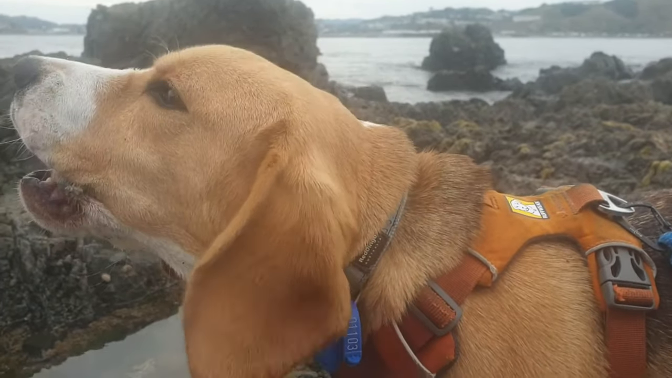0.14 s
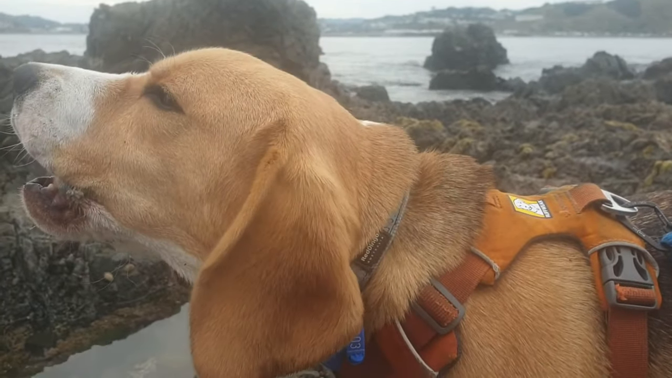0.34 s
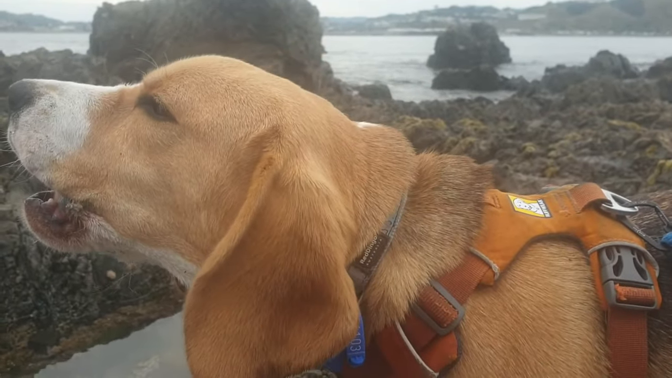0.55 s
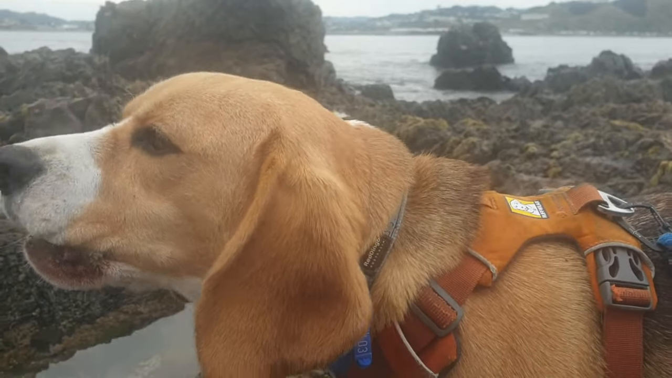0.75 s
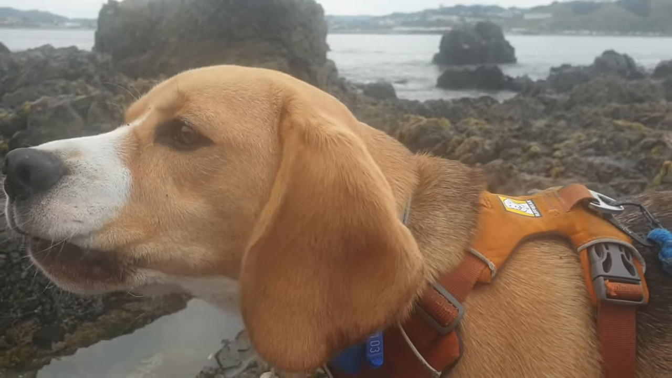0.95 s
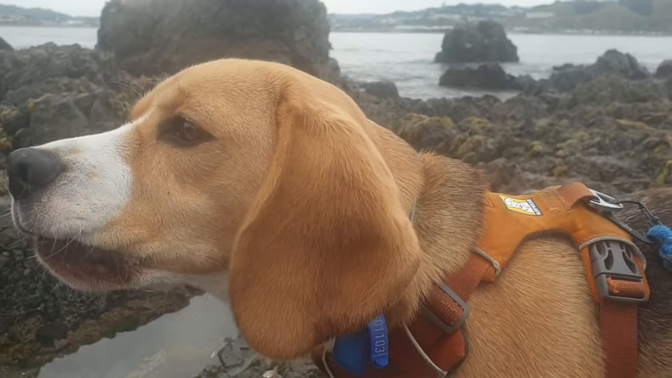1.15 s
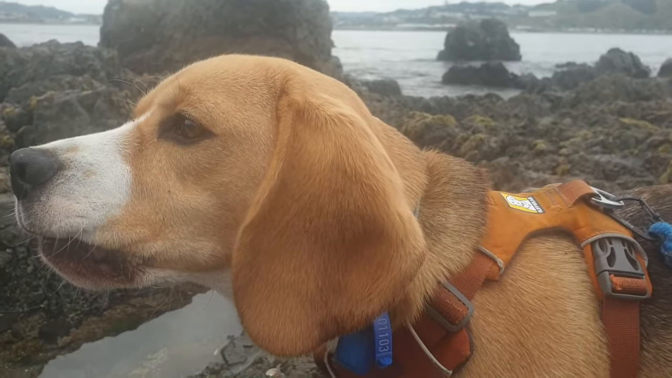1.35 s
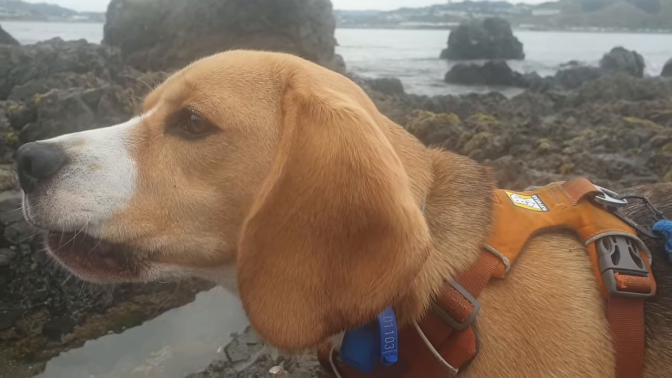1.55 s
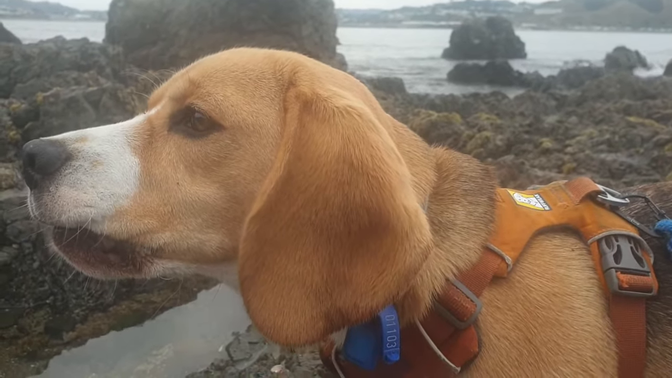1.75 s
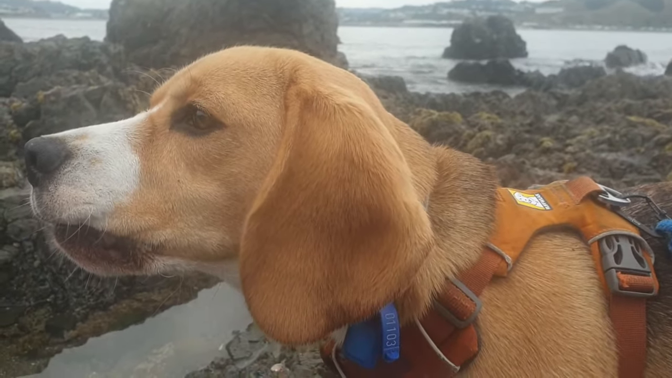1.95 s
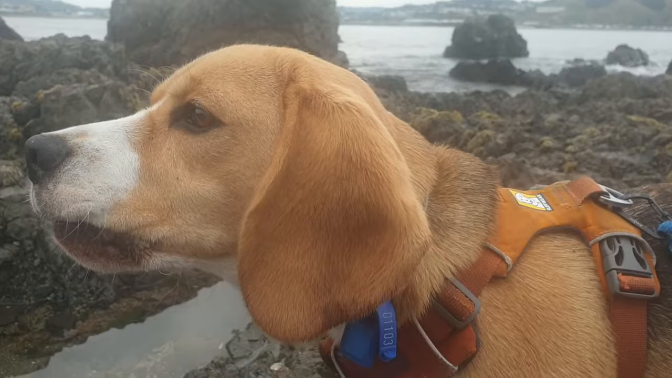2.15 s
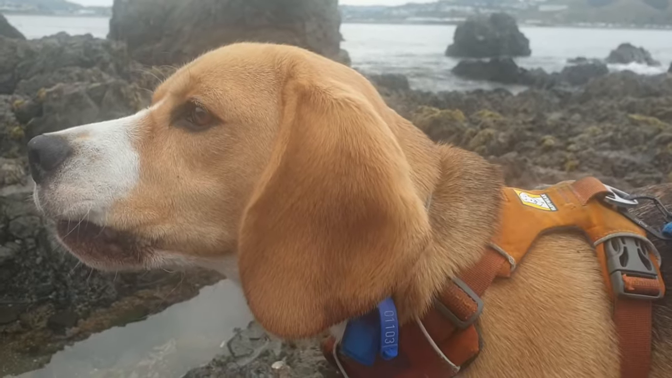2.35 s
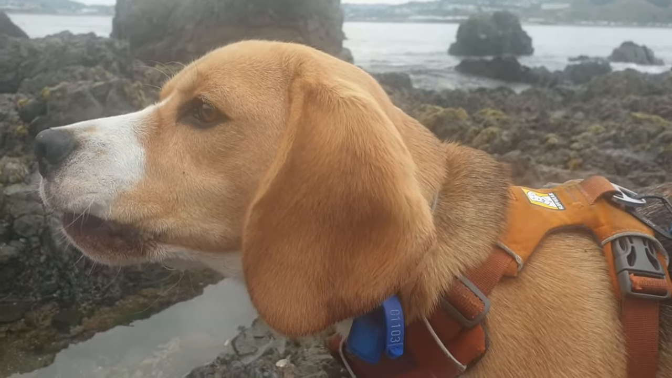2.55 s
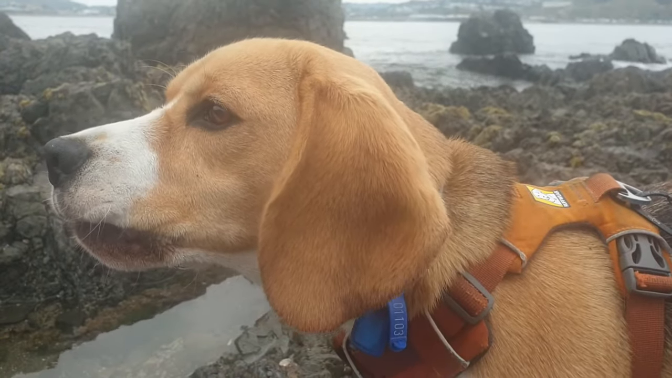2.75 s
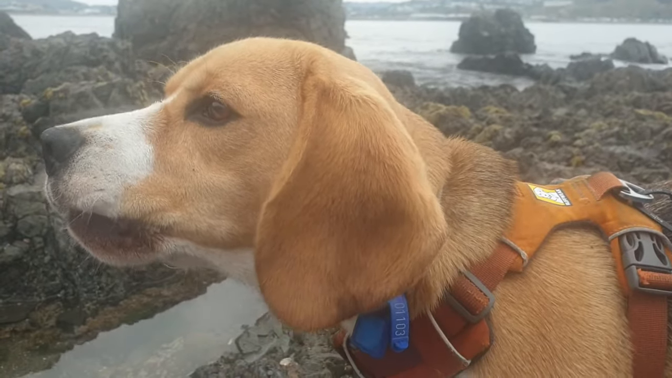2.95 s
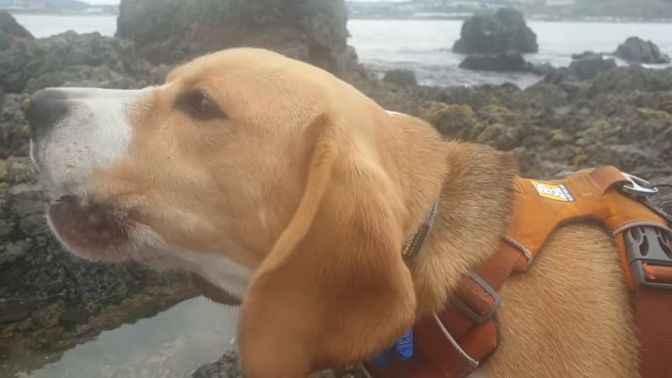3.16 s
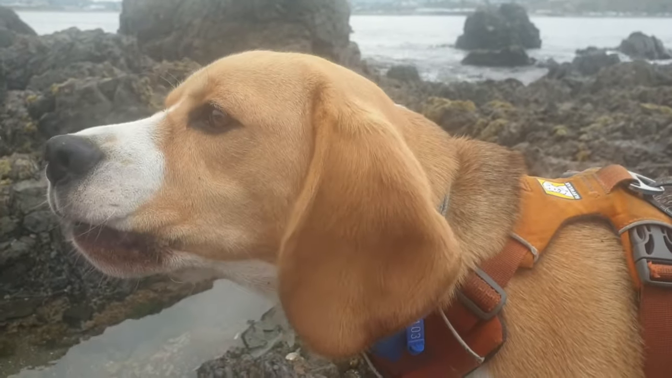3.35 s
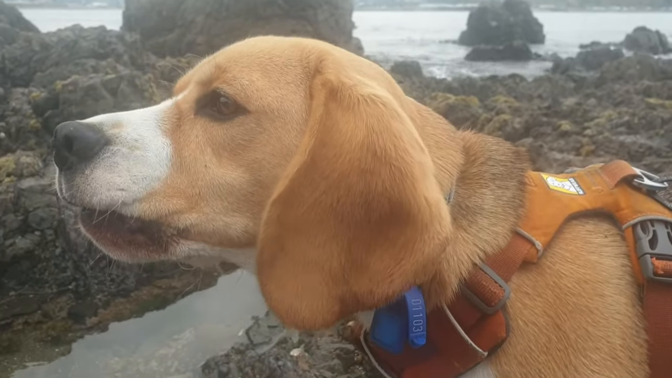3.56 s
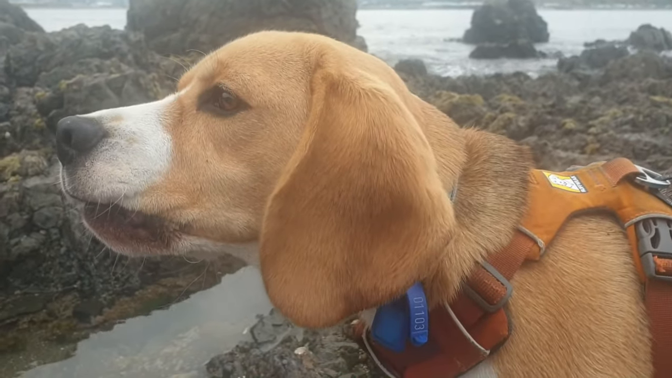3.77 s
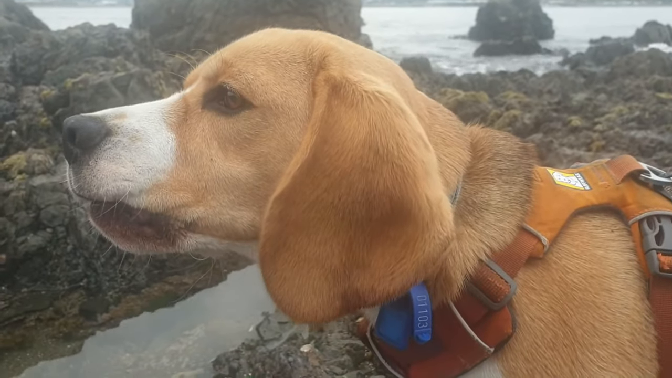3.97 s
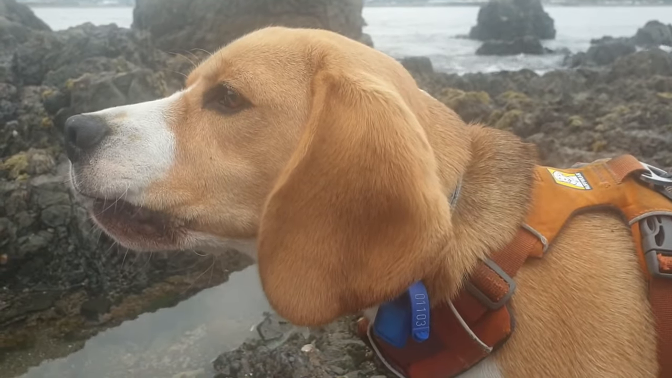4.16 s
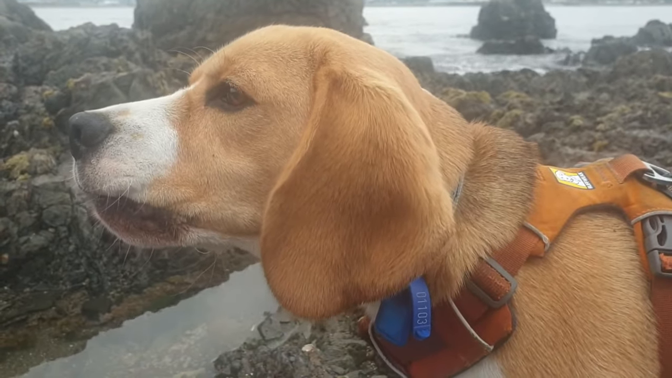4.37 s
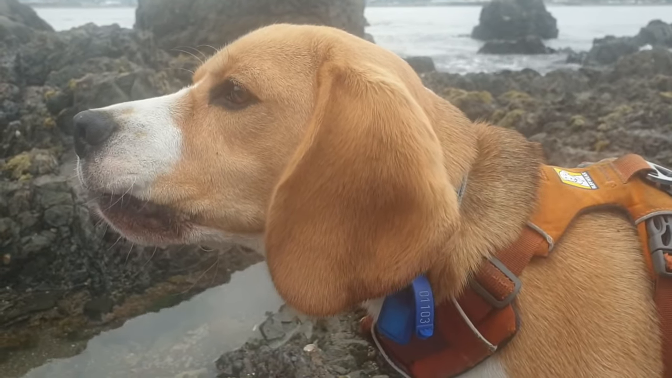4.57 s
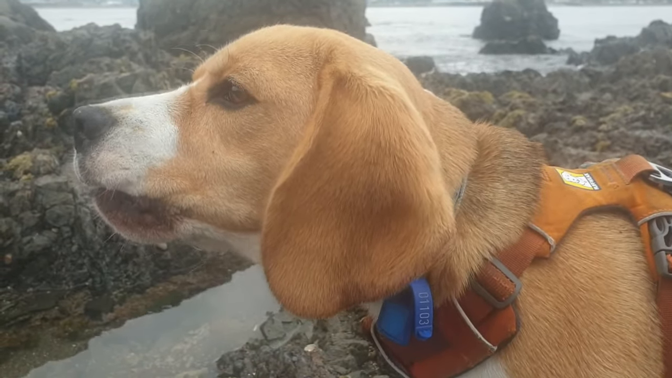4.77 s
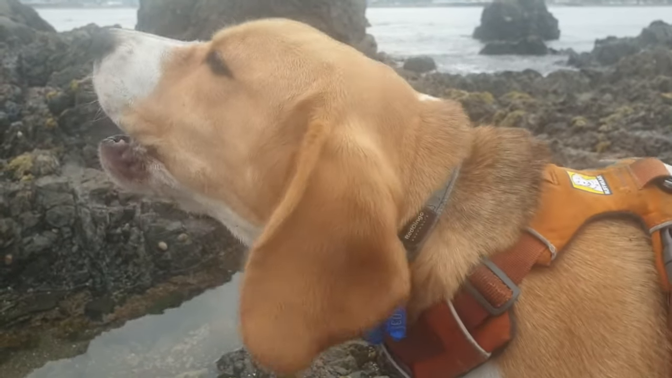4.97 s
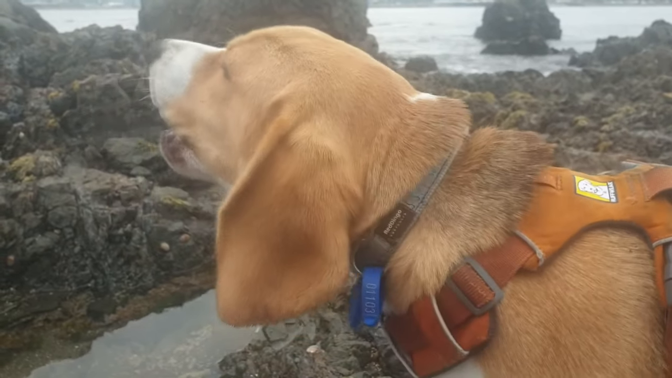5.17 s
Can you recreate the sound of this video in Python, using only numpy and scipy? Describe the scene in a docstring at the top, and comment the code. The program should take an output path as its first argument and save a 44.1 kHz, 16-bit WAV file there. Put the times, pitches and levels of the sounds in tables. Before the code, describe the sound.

A hound bays beside the microphone on an open rocky shore, dry and very loud against a quiet background. At 0 s a chesty grunt snaps into a brassy bark, rising quickly, splitting into two clashing pitches with a rough flutter, then settling on a clear, higher, nasal tone that dulls and stops by about 0.75 s. Only soft low wind rumble, irregular microphone bumps and a faint, lapping sea with thin hiss remain. From about 2.1 s a faint low growl swells, leading to a second howl at 2.95 s: a short, hoarse, harsh bark that falls sharply in pitch and ends near 3.25 s. Quiet wind and sea return, with a few low bumps. A short faint growl at 4.45 s leads to the third bay at 4.8 s, bright and blaring, raspy, then steadying into a held tone that still sounds as the scene ends around 5.2 s. The dog is stronger on the left.

```python
"""A hound howls three times, close by, on a rocky shore: two coupled vocal oscillations a fifth apart and
fluttering tissue share one glottis, whose pulses excite the resonances of throat and mouth. Each howl starts as
a brassy bark, splits into two clashing pitches with a harsh flutter, then settles on the upper or drops away.
A faint low growl, a hum with chopped noise, swells ahead of the later howls. Light wind bumps the microphone as
low noise and short swings, over a faint sea of coloured noise.
"""
import sys
import numpy as np
from scipy import signal
from scipy.fft import rfft, irfft, next_fast_len
from scipy.io import wavfile
from scipy.ndimage import uniform_filter1d, minimum_filter1d

SR = 44100
rng = np.random.default_rng(int(sys.argv[2]) if len(sys.argv) > 2 else 0)


def digitize_waveform(pressure):
    """Quantize a signal to 16-bit integers and store it at the path in sys.argv[1].

    Rows of a 2-D input are taken as channels; values are limited to [-1, 1].
    """
    field = np.atleast_2d(pressure).T
    bounded = np.clip(field, -1, 1)
    quanta = np.round(bounded * 32767).astype(np.int16)
    wavfile.write(sys.argv[1], SR, quanta)


N = 229740
TIME = np.arange(N) / SR

# stages of a howl: softness of a change of stage and of register, fading of the flutter, half length of the blare
STAGE_S, HANDOVER_S, CALM_S, BLARE_S = .005, .016, .013, .016
VOICE_DB, UPPER_DB = 3, 1   # level of the voice; extra carry of the upper tone
UPPER_RATIO = 3 / 2   # the two oscillations lock a fifth apart
FLUTTER_HZ = 607.8
# before the voice catches
HOARSE_RASP_DB, HOARSE_FLUTTER_DB, HOARSE_LOWER_DB = -2.5, -5, -4
CLEAR_RASP_DB = -47   # rasp on the upper tone alone
LOWER_REST_DB = -15.5   # the lower tone while the upper one leads
LEAD_TREBLE_DB, PURE_TREBLE_DB = 2.5, -8.5   # while the upper tone leads; added once the lower tone has stopped
CLASH_BRIGHT_DB = 1.5   # clashing folds close more sharply
# the voice is duller until this long before the blare, while the jaw opens
OPENING_S, OPENING_DB_PER_S = .0067, 250
OVERTONES_FADE_DB_PER_S, TREBLE_FADE_DB_PER_S = 59.5, 43   # as the jaw closes
# as the pitch drops below this the folds slacken, fully after this range
SLACK_HZ, SLACK_RANGE_HZ = 469.6, 131.5
SLACK_RASP_DB, SLACK_OVERTONES_DB = -6, 3   # slack folds buzz
SLACK_RELIEF = .85   # share of the overtones' fade that slack folds undo
# this long after the blare the closures turn ragged, until the flutter ends
RAGGED_AFTER_S = .023
MISTIMING, RAGGED_MISTIMING = .11, .24   # radians at full snap: always; added while ragged
MOUTH_NULL_HZ, MOUTH_NULL_Q = 3779, 3   # antiresonance of the mouth
GROWL_START_HZ, GROWL_TOP_HZ = 95.45, 121.8
# a growl builds over this share of its length, then holds
GROWL_BUILD_SHARE, HUM_SWELL_DB, RATTLE_SWELL_DB = .6, 11.5, 9
DIFFUSE_DB, DIFFUSE_S, DIFFUSE_HZ = -8, .004, 5000   # diffuse top treble: level, decay, lower edge
CEILING, CUTOFF_HZ = .97, 15600   # limiter, as a share of full scale; upper edge of the sound


def from_db(db):
    """Amplitude ratio on the decibel scale: 20 dB is a factor of ten."""
    return 10 ** (np.asarray(db) / 20)


def rms_one(x):
    """Normalization of the mean power to one."""
    return x / np.sqrt(np.mean(x ** 2) + 1e-20)


def in_time(rows, t):
    """Linear interpolation of each column of a curve at the times t."""
    s, *columns = np.transpose(rows)
    return [np.interp(t, s, c) for c in columns]


def span(start_s, end_s, fade=.008):
    """Gating: the times from start to end, and a gate whose short ramps avoid clicks."""
    t = TIME[(TIME >= start_s - fade) & (TIME <= end_s + fade)]
    return t, np.clip(np.minimum(t - t[0], t[-1] - t) / fade, 0, 1)


def after(t, s, soft_s=STAGE_S):
    """Sigmoid transition from 0 to 1 about the time s."""
    return (1 + np.tanh((t - s) / (2 * soft_s))) / 2


def drift(rate, size):
    """Low-passed random fluctuation that changes about `rate` times a second; spread 1."""
    r = np.exp(-2 * np.pi * rate / SR)
    run_in = SR // 4
    noise = rng.standard_normal(size + run_in)
    return rms_one(signal.lfilter([1 - r], [1, -2 * r, r * r], noise)[run_in:])


def high_pass(x, hz, order=4):
    """Butterworth high-pass: flat above its edge."""
    return signal.sosfilt(signal.butter(order, hz, "high", fs=SR, output="sos"), x)


def low_pass(x, hz, order=10):
    """Butterworth low-pass: flat below its edge."""
    return signal.sosfilt(signal.butter(order, hz, "low", fs=SR, output="sos"), x)


def resonate(x, modes):
    """Parallel damped resonances, each applied twice so that the valleys stay dark."""
    out = 0
    for hz, width, db in modes:
        r = np.exp(-np.pi * width / SR)
        b = (1 - r * r) / 2 * np.array([1, 0, -1])
        a = [1, -2 * r * np.cos(2 * np.pi * hz / SR), r * r]
        out = out + from_db(db) * signal.lfilter(b, a, signal.lfilter(b, a, x))
    return out


def evened(x, size=700):
    """Automatic gain: holds the moving rms near 1 while keeping the fine grain."""
    power = uniform_filter1d(uniform_filter1d(x * x, size), size)
    return x / np.sqrt(np.abs(power) + 1e-20)


def coloured(x, spectrum):
    """Spectral shaping of noise through (frequency [Hz], relative level [dB]) points; rms 1."""
    hz, db = np.transpose(spectrum)
    size = next_fast_len(x.shape[-1])
    bins = np.maximum(np.fft.rfftfreq(size, 1 / SR), 1)
    gain = from_db(np.interp(np.log(bins), np.log(hz), db, left=-120, right=-120))
    return rms_one(irfft(rfft(x, size) * gain, size)[..., :x.shape[-1]])


def oscillator(hz):
    """Phase is the integral of frequency: a unit rotation that follows a pitch curve."""
    return np.exp(2j * np.pi * np.cumsum(hz) / SR)


def delayed(x, seconds):
    """Travel time: the sound arrives later by a path delay."""
    return np.interp(TIME - seconds, TIME, x, left=0)


def stereo_noise(alike):
    """Partial coherence: two noises that share the fraction `alike` of their power."""
    alike = np.clip(alike, 0, 1)
    return np.sqrt(alike) * rng.standard_normal(N) + np.sqrt(1 - alike) * rng.standard_normal((2, N))


def bumps(rows, rise_s, wobble):
    """Damped transients: each event swells and dies within a few uneven cycles."""
    out = np.zeros(N)
    for s, db, hz in rows:
        start = max(int(s * SR), 0)
        age = TIME[:min(SR // 8, N - start)] / rise_s
        swing = oscillator(hz * (1 + wobble * drift(34, len(age)))).imag
        out[start:start + len(age)] += from_db(db) * swing * age * np.exp(1 - age)
    return out


def sea(swell_db=3.23, lap_db=2.0):
    """Amplitude-modulated broadband noise: a faint wash swells and laps, with a thin hiss on top."""
    # mean course before the swell: (time [s], wash level [dB], hiss level [dB])
    sea_levels = [(0, -71.5, -89.5), (1.3, -74, -81.5), (1.9, -63, -78), (2.7, -64, -72),
                  (3.4, -66.5, -80.5), (4.3, -59, -78.5), (5.2, -62.5, -67.5)]
    # spectra of wash and hiss: (frequency [Hz], relative density [dB])
    wash_colour = [(120, -21), (200, -3), (340, 1), (460, -11), (650, -9), (850, -13.5), (1130, -29),
                   (1400, -23), (2000, -36), (3200, -45.5)]
    hiss_colour = [(1800, -4.5), (3000, -10.5), (3600, -3.5), (4300, -5), (5500, 0.5), (7500, -6),
                   (11300, -0.5), (12500, -12), (15000, -20)]
    wash, hiss = from_db(in_time(sea_levels, TIME) + swell_db * drift(3.5, N))
    wash = wash * from_db(lap_db * drift(9.2, N))
    return wash * coloured(stereo_noise(.44), wash_colour) + hiss * coloured(stereo_noise(.073), hiss_colour)


def wind(left_db=-1.5, right_db=1, lumpy_db=2.5):
    """Turbulent pressure at the ports: a lumpy low rumble, only partly coherent between them."""
    # strength before the balance of the ports: (time [s], level [dB])
    wind_strength = [(0, -49.5), (.8, -52), (1.35, -56.5), (2.0, -52), (2.6, -46), (3.4, -55), (4.3, -58),
                     (4.8, -46), (5.2, -51.5)]
    # spectrum: (frequency [Hz], relative density [dB])
    wind_colour = [(12, -45), (20, -16), (59, 0), (118, -2.5), (172, -7.5), (274, -15), (349, -17.5),
                   (458, -31.5), (600, -27), (780, -50), (1320, -120)]
    level, = in_time(wind_strength, TIME)
    lumps = lumpy_db * np.array([drift(10, N), drift(11, N)])
    rumble = rms_one(coloured(stereo_noise(.46), wind_colour) * from_db(lumps))
    return rumble * from_db(level) * from_db([[left_db], [right_db]])


def buffets(rise_s=.0088, left_db=-1, right_db=1):
    """Eddy pressure transients: each shoves either port to and fro in its own way."""
    # single buffets before the balance: (time [s], peak of the envelope [dB], mean pitch [Hz])
    buffet_events = [(0.765, -39.5, 85.7), (0.869, -41.5, 114), (0.916, -37.5, 71.4), (1.111, -37.5, 104),
                     (1.185, -43.5, 99.6), (1.487, -38.5, 64.3), (1.769, -34, 102.6), (1.991, -40.5, 56.6),
                     (3.954, -40.5, 66), (4.505, -35, 70.5), (4.802, -37, 73.8), (5.052, -37, 113)]
    return np.array([from_db(db) * bumps(buffet_events, rise_s, wobble=.22) for db in (left_db, right_db)])


def growl(row, jitter=.06, shimmer_db=3.0, throb=.82, rattle_pan_db=4.5):
    """Relaxation of slack throat tissue: it hums at a low, unsteady pitch and chops the air into a rattle."""
    # spectrum of the rattle: (frequency [Hz], relative density [dB])
    rattle_colour = [(110, -10.5), (160, 1.5), (250, -3), (340, -7), (460, -22.5), (620, -6), (760, -23.5),
                     (950, -23), (1200, -37), (2100, -43), (3200, -47)]
    start_s, end_s, hum_db, rattle_db = row
    t, gate = span(start_s, end_s, fade=.033)
    size = len(t)
    loose = np.clip(1 - (t - start_s) / (GROWL_BUILD_SHARE * (end_s - start_s)), 0, 1)
    hz = GROWL_TOP_HZ + (GROWL_START_HZ - GROWL_TOP_HZ) * loose
    flap = oscillator(hz * (1 + jitter * drift(22, size))).real
    hum_level = from_db(hum_db - HUM_SWELL_DB * loose + shimmer_db * drift(14, size))
    hum = np.sqrt(2) * flap * hum_level
    chopped = rng.standard_normal(size) * (1 + np.clip(throb, 0, 1) * flap / 2)
    rattle = coloured(chopped, rattle_colour) * from_db(rattle_db - RATTLE_SWELL_DB * loose)
    # the rattle is louder on the left
    sides = [gate * (hum + rattle * from_db(side * rattle_pan_db)) for side in (1, -1)]
    return np.array([np.interp(TIME, t, x, left=0, right=0) for x in sides])


def closures(cycle, snap, mistiming):
    """Glottal pulse train as a geometric series: each harmonic is `snap` times the one below, no fundamental."""
    # slightly mistimed, one pulse per turn of the rotation
    cycle = cycle * np.exp(1j * mistiming * snap * drift(320, len(cycle)))
    return evened((cycle ** 2 / (1 - np.clip(snap, 0, .9) * cycle)).real)


def registers(t, low_hz, effort_db, stages):
    """Vocal registers share a howl's power: hoarse, bark, clash and clear tone, then slack folds."""
    blare_s, catch_s, split_s, calm_s, lead_s, stop_s, close_s = stages[:7]
    sharp, flutter_db, upper_db, bark_rasp_db, clash_rasp_db, overtones_db, treble_db, blare_db, wide_db = stages[7:]
    hoarse = 1 - after(t, catch_s)
    calm = after(t, calm_s, CALM_S)
    clash = after(t, split_s) * (1 - calm)
    ragged = after(t, blare_s + RAGGED_AFTER_S) * (1 - calm)
    lead = after(t, lead_s, HANDOVER_S)
    pure = after(t, stop_s, CALM_S)
    slack = calm * np.clip((SLACK_HZ - low_hz) / SLACK_RANGE_HZ, 0, 1)
    low = (1 - lead) * from_db(HOARSE_LOWER_DB * hoarse) + from_db(LOWER_REST_DB) * lead * (1 - pure)
    high = lead + from_db(upper_db) * (1 - lead) * (clash + hoarse + slack)
    flutter = from_db(flutter_db) * clash + from_db(HOARSE_FLUTTER_DB) * hoarse
    lower_rasp = from_db(bark_rasp_db) * (1 - clash) + from_db(SLACK_RASP_DB) * slack
    rasp = (from_db(HOARSE_RASP_DB) * hoarse + from_db(clash_rasp_db) * clash
            + from_db(CLEAR_RASP_DB) * lead + lower_rasp * (1 - lead))
    level_db = effort_db + VOICE_DB
    parts = np.array([low, high, flutter, rasp])
    parts = parts / np.linalg.norm(parts, axis=0) * from_db(level_db + UPPER_DB * lead)
    # the voice brightens as the jaw opens, blares briefly at full strength and dulls as the jaw closes
    opening = np.maximum(blare_s - OPENING_S - t, 0)
    closing = np.maximum(t - close_s, 0)
    blare = np.exp(-((t - blare_s) / BLARE_S) ** 2)
    wide = from_db(level_db + wide_db) * blare
    bright_db = level_db - OPENING_DB_PER_S * opening + blare_db * blare + CLASH_BRIGHT_DB * clash
    overtones_fade_db = OVERTONES_FADE_DB_PER_S * closing * (1 - SLACK_RELIEF * slack)
    overtones = from_db(bright_db + overtones_db - overtones_fade_db + SLACK_OVERTONES_DB * slack)
    treble = from_db(bright_db + treble_db - TREBLE_FADE_DB_PER_S * closing
                     + LEAD_TREBLE_DB * lead + PURE_TREBLE_DB * pure)
    # the upper tone runs sharp until it leads; over a slack lower tone it slips to the octave
    ratio = UPPER_RATIO * (1 + sharp * (1 - lead))
    high_hz = low_hz * (ratio + (2 - ratio) * slack * (1 - lead))
    return high_hz, *parts, overtones, treble, wide, ragged


def howl(pitch, loudness, stages, throat, mouth, wide_mouth, jitter=.0019, lower_jitter=.02, upper_jitter=.032,
         flutter_jitter=.038, shimmer_db=4.0, air_db=-10, lower_drive=2.6):
    """Source and filter: two oscillations and fluttering tissue share a glottis whose closures make overtones."""
    # resonances of the turbulent rasp: (frequency [Hz], width of one pass [Hz], relative level [dB])
    rasp_modes = [(498.3, 180, 3.5), (817, 360, 10), (1260, 600, -11.5)]
    t, gate = span(loudness[0][0], loudness[-1][0])
    size = len(t)
    low_hz, effort_db = in_time(pitch, t) + in_time(loudness, t)
    high_hz, low, high, flutter, rasp, overtones, treble, wide, ragged = registers(t, low_hz, effort_db, stages)
    effort = np.sqrt(low ** 2 + high ** 2 + flutter ** 2 + rasp ** 2)

    # the more the tissue flutters, the less steady the voice is; the upper tone is steady once it leads
    rough = np.hypot(flutter, rasp) / effort
    lower = oscillator(low_hz * (1 + (jitter + lower_jitter * rough) * drift(57, size)))
    upper = oscillator(high_hz * (1 + (jitter + upper_jitter * (1 - high / effort)) * drift(70, size)))
    loose = oscillator(FLUTTER_HZ * (1 + flutter_jitter * drift(45, size)))
    motion = 0
    for level, part in ((low, lower), (high, upper), (flutter, loose)):
        motion = motion + level * part.real * from_db(shimmer_db * rough * drift(59, size))
    turbulence = low_pass(high_pass(resonate(rng.standard_normal(size), rasp_modes), 330), 1550)
    voice = np.sqrt(2) * motion + rasp * evened(turbulence)

    # closing on the summed motion gives sum and difference tones; the folds snap harder with effort
    cycle = np.exp(1j * np.angle(signal.hilbert(voice)))
    snap = np.interp(20 * np.log10(effort), [-21, -9], [.62, .85])
    mistiming = MISTIMING + RAGGED_MISTIMING * ragged
    shared_pulses = closures(cycle, snap, mistiming)
    lower_pulses = np.tanh(lower_drive * low / effort) * closures(lower, snap, mistiming)
    # air hisses through while the glottis is open
    air = from_db(air_db) * (rough + .12) * (1 + cycle.real) * rng.standard_normal(size)
    source = shared_pulses + lower_pulses + air

    throat_sound = low_pass(high_pass(resonate(source, throat), 900, order=6), 1650)
    mouth_null = signal.iirnotch(MOUTH_NULL_HZ, MOUTH_NULL_Q, fs=SR)
    mouth_sound = high_pass(signal.lfilter(*mouth_null, resonate(source, mouth)), 1400, order=6)
    voice = voice + overtones * evened(throat_sound) + treble * evened(mouth_sound)
    voice = voice + wide * evened(resonate(source, wide_mouth))
    return np.interp(TIME, t, gate * voice, left=0, right=0)


def beside_microphone(dog):
    """Diffraction and reflection: the right port hears a muzzle on the left later; rocks return the treble."""
    # the right port in the shadow of the housing: (frequency [Hz], lag [s], level [dB])
    shadow = [(151, 0.00012, 3), (383.5, 0.00073, -5.5), (540, 0.0002, -5), (760, 0.00034, -4.5),
              (1020, .00034, -9), (1210, 0.00025, -4), (1594, 0.00032, -7), (2080, 0.00031, -7.5),
              (2750, .00037, -11), (5000, 0.00016, -9), (10900, 0.00012, -7.5)]
    # echoes off small rocks: (delay [s], left level [dB], right level [dB])
    rocks = [(.0017, -21, -18.5), (.0074, -23, -22), (.019, -31.5, -33.5), (0.041, -47, -45)]
    size = next_fast_len(N + SR // 10)
    bins = np.maximum(np.fft.rfftfreq(size, 1 / SR), 1)
    hz, *columns = np.transpose(shadow)
    lag, db = (np.interp(np.log(bins), np.log(hz), c) for c in columns)
    path = from_db(db) * np.exp(-2j * np.pi * bins * lag)
    right = irfft(rfft(dog, size) * path, size)[:N]
    out = np.array([dog, right])
    bright = high_pass(dog, 1400, order=1)
    for seconds, left_echo_db, right_echo_db in rocks:
        out = out + from_db([[left_echo_db], [right_echo_db]]) * delayed(bright, seconds)
    # a short decaying noise tail, different in each port, makes the top treble diffuse and wide
    tail = rng.standard_normal((2, SR // 10)) * np.exp(-TIME[:SR // 10] / DIFFUSE_S)
    tail = from_db(DIFFUSE_DB) * tail / np.linalg.norm(tail, axis=1, keepdims=True)
    return out + signal.fftconvolve(high_pass(dog, DIFFUSE_HZ)[None], tail)[:, :N]


def scene():
    """Superposition: the dog close to the microphone, in light wind by the sea."""
    # lower vocal oscillation in each howl: (time [s], pitch [Hz])
    pitches = [(0.0, 201.2), (.02, 440.4), (.06, 518.1), (.13, 557.1), (.2, 529.6), (.25, 481), (.51, 494),
               (0.674, 478), (0.719, 278.4)], [(2.95, 151.1), (2.98, 309.7), (3.0, 451.9), (3.05, 529.7), (3.1, 540),
                                (3.158, 585), (3.176, 510.4), (3.19, 402), (3.26, 305.8)], [(4.78, 173), (4.83, 464.5), (4.85, 503.2), (4.88, 539.9),
                                                 (4.92, 564.4), (4.95, 516.7), (5.04, 499), (5.12, 487.6),
                                                 (5.21, 479.6)]
    # loudness of each howl before the level of the voice: (time [s], level [dB])
    efforts = [(0.0, -30.5), (0.014, -17.5), (0.036, -16.5), (0.062, -7), (0.184, -17), (0.238, -23),
               (0.688, -25), (0.775, -69)], [(2.95, -49), (3.002, -13.5), (3.036, -8), (3.06, -12.5), (3.072, -11.5),
                                 (3.168, -18.5), (3.194, -32), (3.25, -41), (3.275, -67)], [(4.797, -37.5), (4.815, -26), (4.853, -12),
                                                   (4.875, -10.5), (4.917, -10.5), (4.957, -19.5),
                                                   (4.965, -15.5), (5.069, -21), (5.077, -23.5),
                                                   (5.21, -22.5)]
    # stages of each howl; a time past its end means never: (blare [s], voice catches [s], splits [s],
    # flutter ends [s], upper tone leads [s], lower tone stops [s], jaw closes [s], upper tone sharp [share],
    # flutter [dB], clashing upper tone [dB], bark rasp [dB], clash rasp [dB], overtones [dB], treble [dB],
    # blare [dB], wide mouth [dB]), levels relative to the other parts or to the voice
    stages = [(.031, .05, .145, .352, .205, .51, 0.39, .01, -6.5, -14, -17.5, -14, -17.5, -35.5, 9.5, -26.5),
              (3.015, 3.0, 3.046, 3.15, 3.5, 3.5, 3.065, .06, 1, -1, -20, -3, -15, -37, 7.5, -25),
              (4.843, 4.826, 4.932, 5.145, 5.07, 5.5, 5.15, .04, 3.5, -10.5, -24, -14, -21, -28, 11.5, -12)]
    # resonances of throat, mouth and, during the blare, wide-open mouth in each howl:
    # (frequency [Hz], width of one pass [Hz], relative level [dB])
    throats = [(1024, 190, 0.5), (1226, 240, -1.5)], [(938.5, 180, 0.00058), (1206, 210, 0.0011)], [(1000, 150, 1), (1450, 440, -9.5)]
    mouths = [(1920, 280, -13.5), (2485, 140, 2), (2948, 130, -18.5), (4780, 1400, -15), (7050, 330, -17),
              (11300, 2900, -8), (13000, 1200, -19.5)], [(1960, 200, -11), (2490, 180, 0.5), (2814, 73, -4.5), (3650, 130, -13.5),
                               (4170, 280, -6.5), (5000, 600, -7.5), (6100, 400, -17), (11500, 1800, 0),
                               (12800, 1000, -6.5)], [(1913, 220, 2), (2456, 200, -7), (2953, 110, -0.5),
                                                (4740, 390, -9), (5130, 630, -10.5), (7410, 400, -17.5),
                                                (11400, 2400, -6.5), (13200, 1200, -16.5)]
    wide_mouths = [(1650, 300, 2), (3280, 450, -1)], [(1380, 200, 7), (2830, 260, 0)], [(1900, 200, 4), (3010, 130, 0)]
    # chesty grunts that open the howls: (time [s], peak of the envelope [dB], mean pitch [Hz])
    grunts = [(0.0, -21, 205.3), (2.957, -31.5, 161.8), (4.797, -36, 222)]
    # growls before their swell and shimmer: (start [s], end [s], hum level [dB], rattle level [dB])
    growls = [(2.121, 2.951, -43, -50.5), (4.45, 4.79, -47, -51)]
    howls = sum(howl(*parts) for parts in zip(pitches, efforts, stages, throats, mouths, wide_mouths))
    dog = howls + bumps(grunts, rise_s=.009, wobble=.13)
    return beside_microphone(dog) + sum(growl(row) for row in growls) + wind() + buffets() + sea()


def record(dry, size=220):
    """Look-ahead limiting: a smooth gain holds the peaks under the ceiling, then the top is cut."""
    allowed = CEILING / np.maximum(np.abs(dry).max(axis=0), CEILING)
    gain = uniform_filter1d(uniform_filter1d(minimum_filter1d(allowed, 2 * size), size), size)
    return signal.sosfilt(signal.cheby2(12, 70, CUTOFF_HZ, fs=SR, output="sos"), gain * dry)


dry = scene()
out = record(dry)
digitize_waveform(out)
```